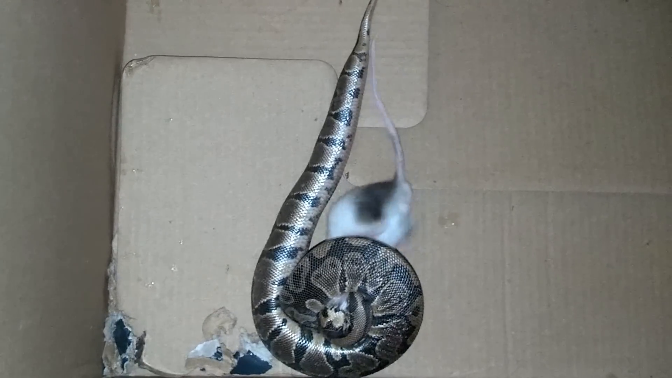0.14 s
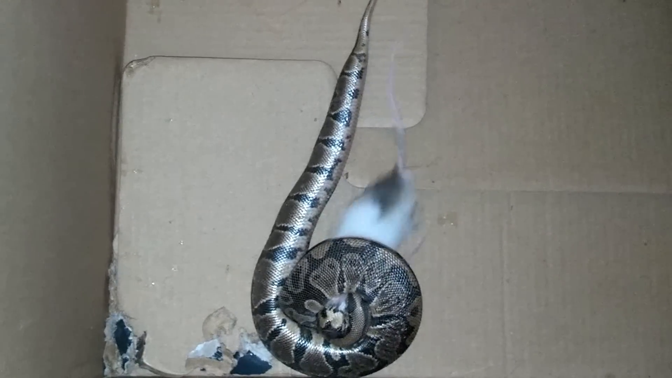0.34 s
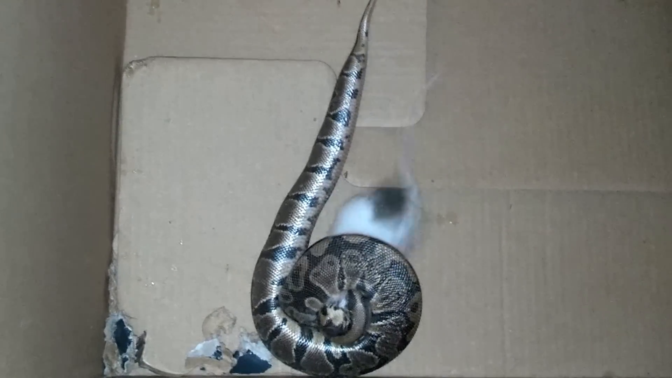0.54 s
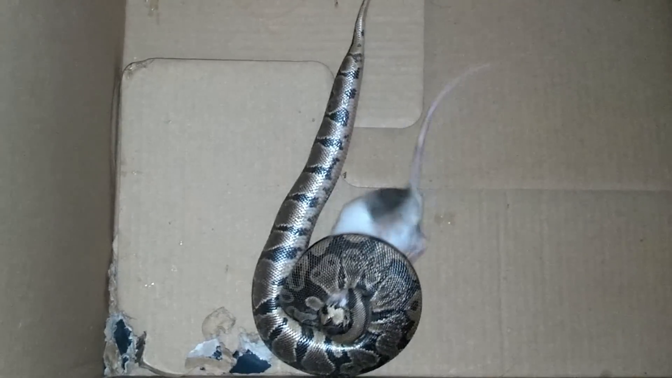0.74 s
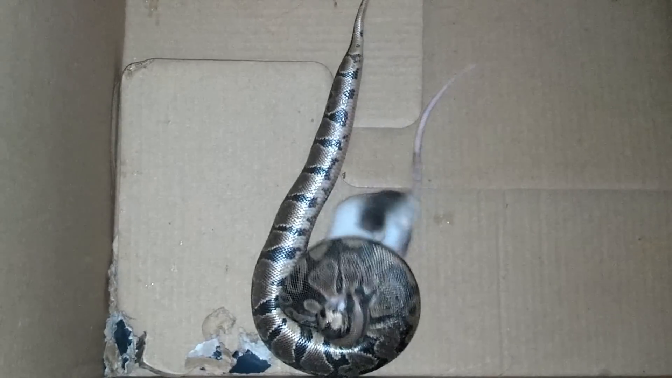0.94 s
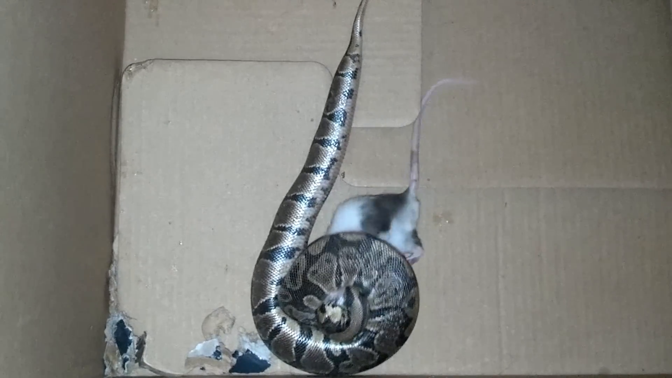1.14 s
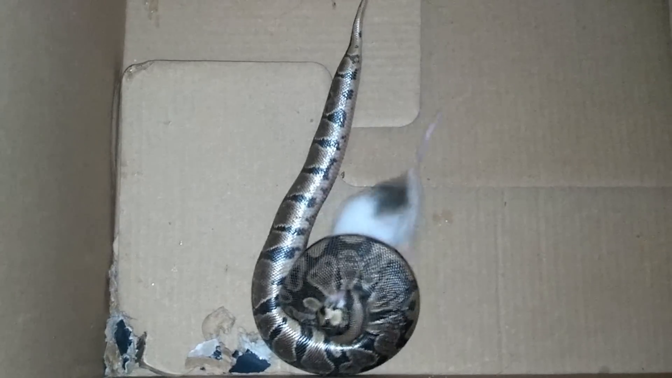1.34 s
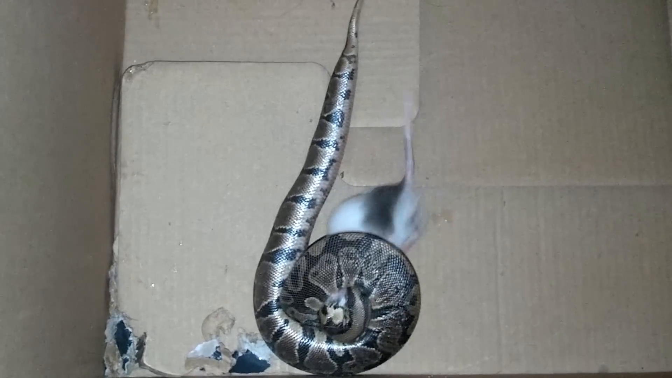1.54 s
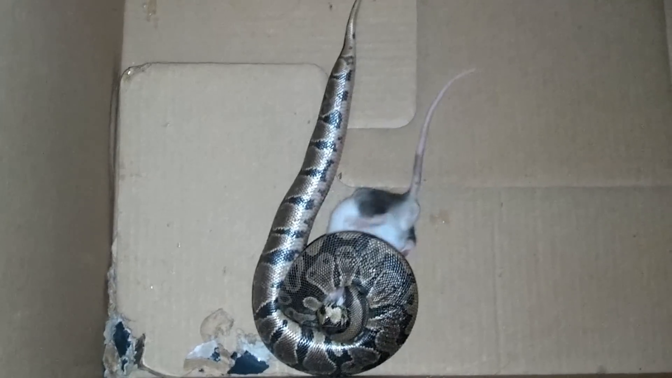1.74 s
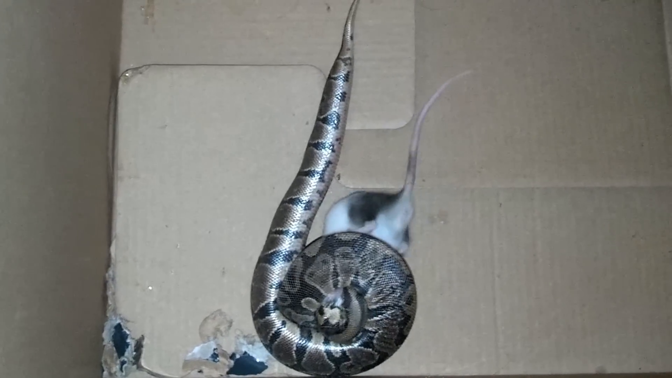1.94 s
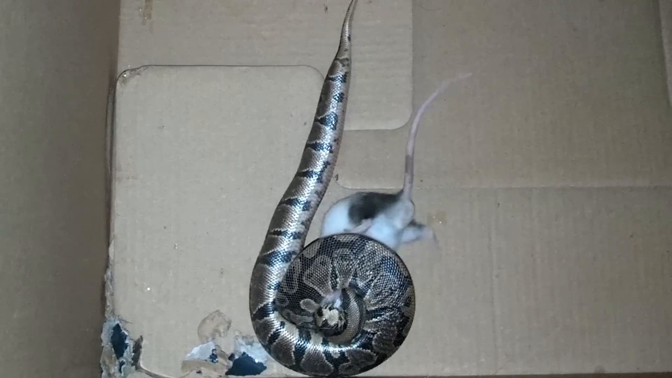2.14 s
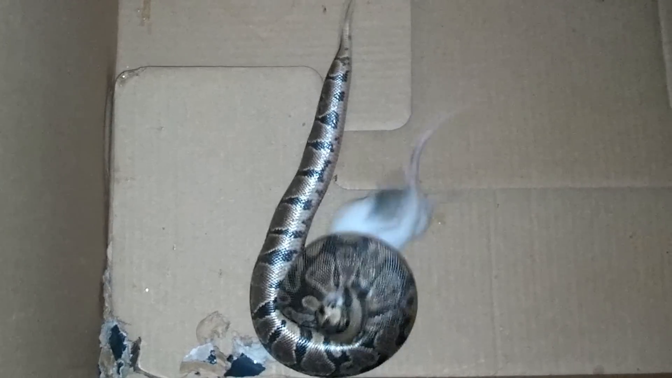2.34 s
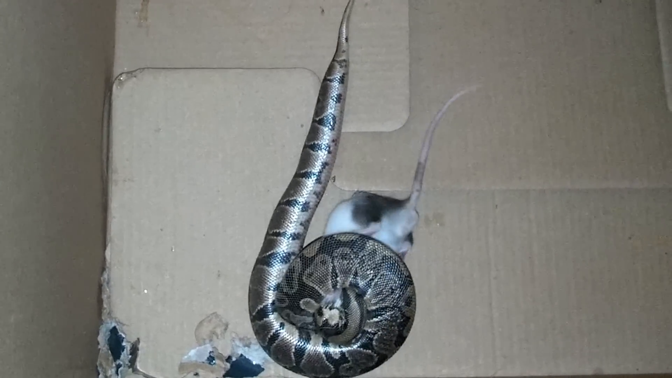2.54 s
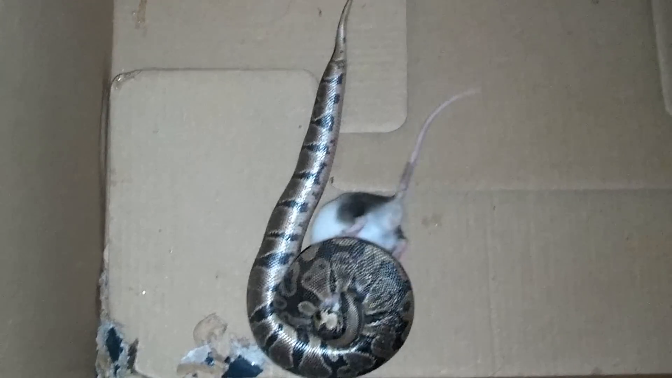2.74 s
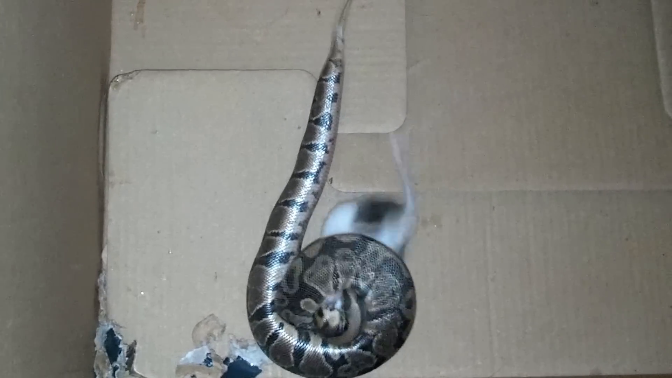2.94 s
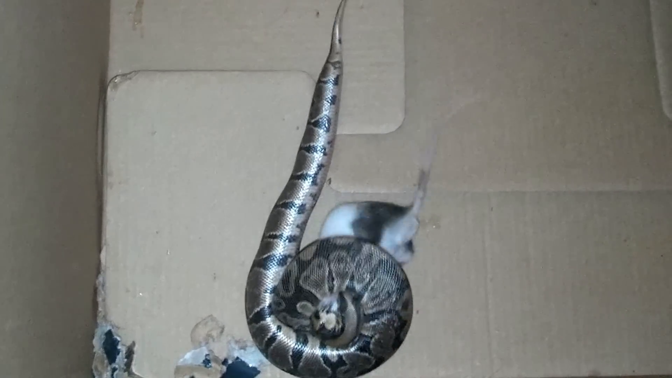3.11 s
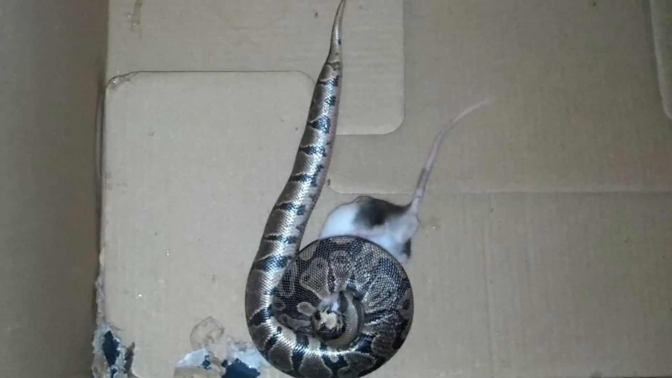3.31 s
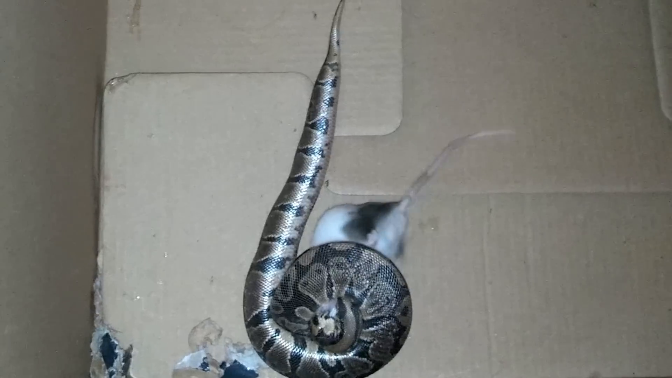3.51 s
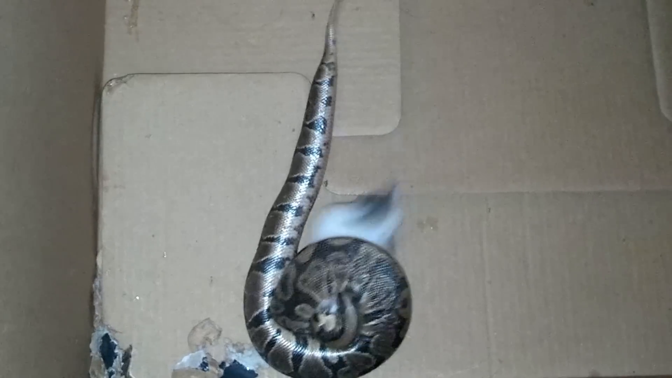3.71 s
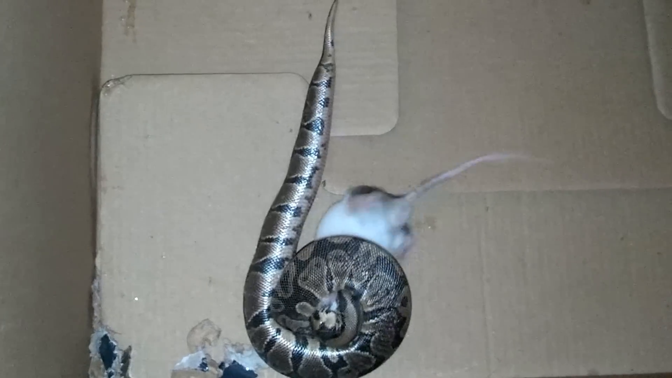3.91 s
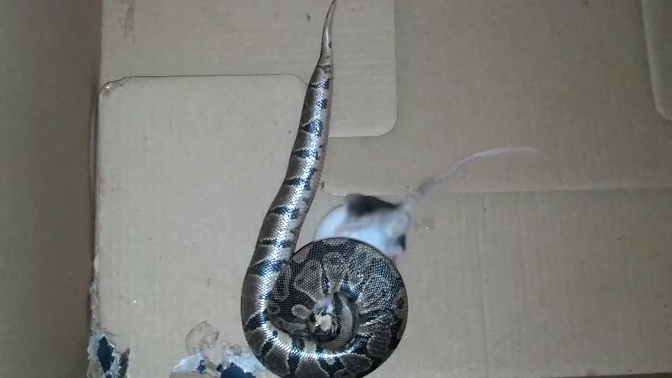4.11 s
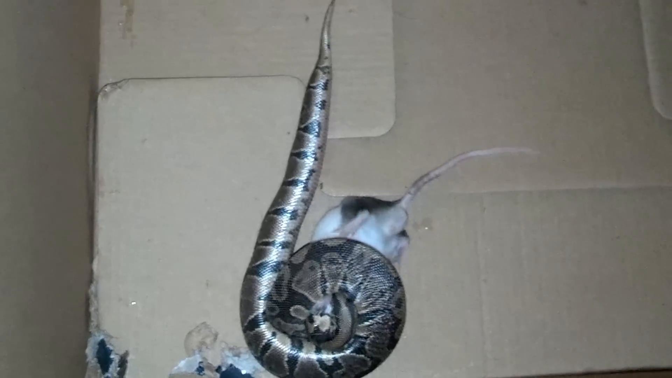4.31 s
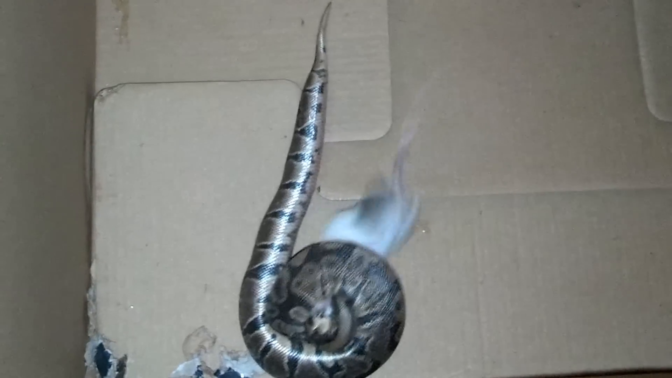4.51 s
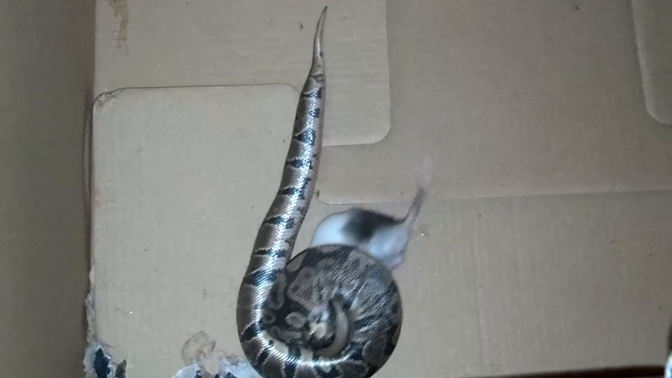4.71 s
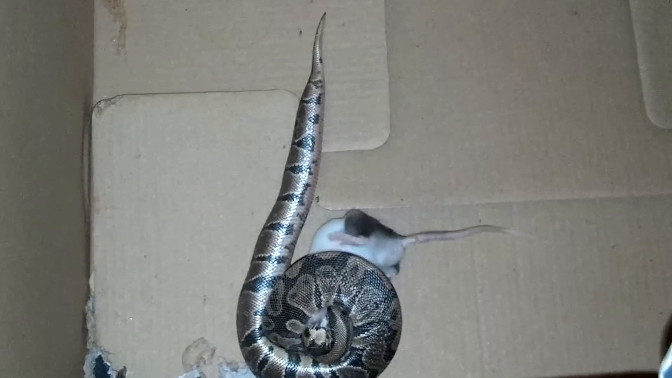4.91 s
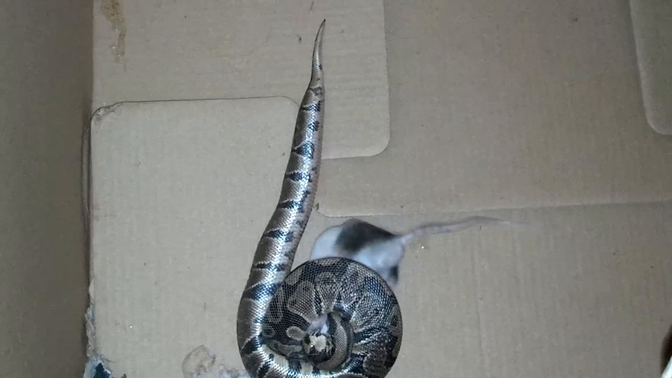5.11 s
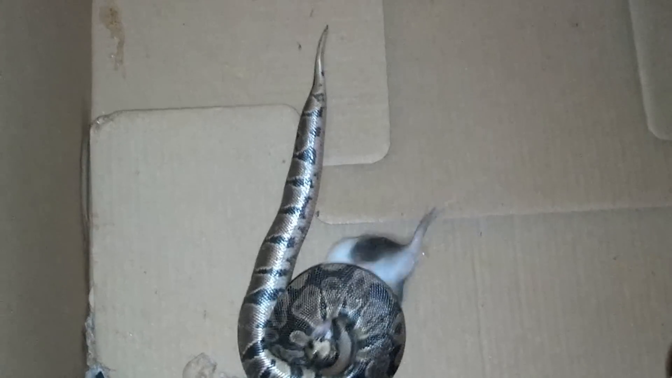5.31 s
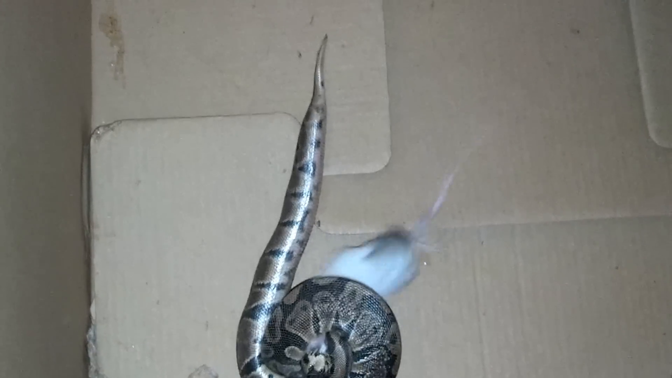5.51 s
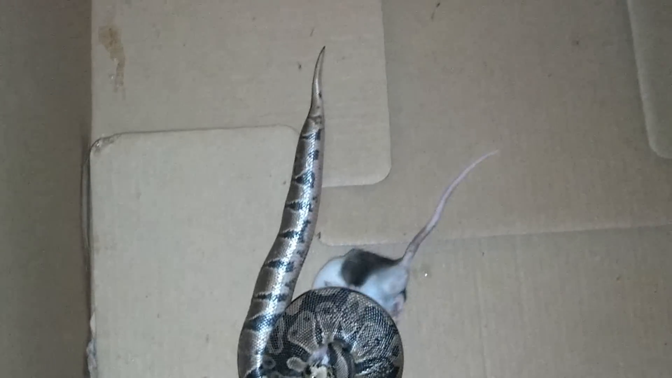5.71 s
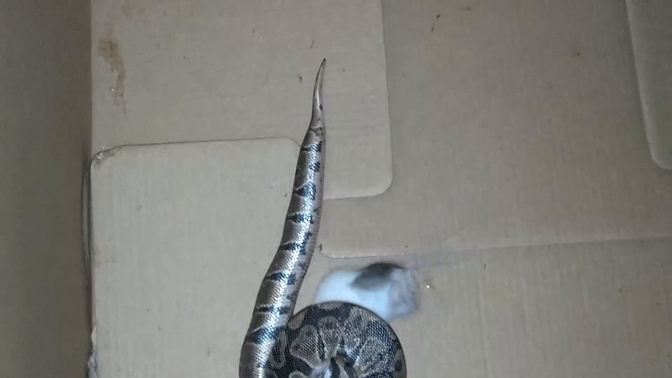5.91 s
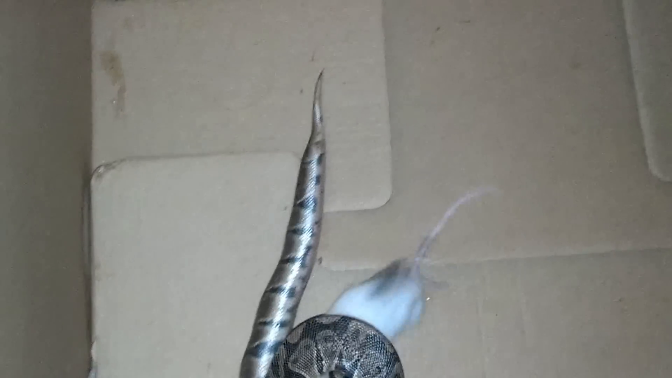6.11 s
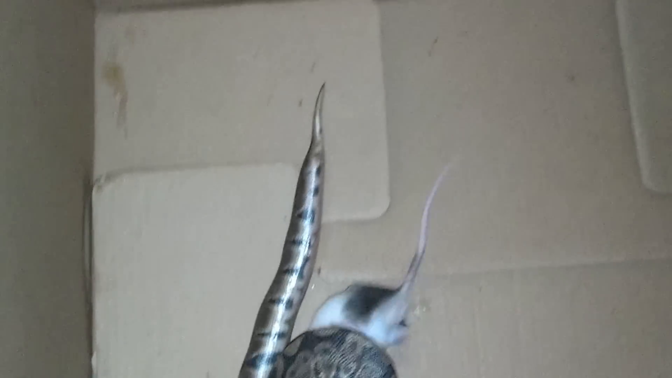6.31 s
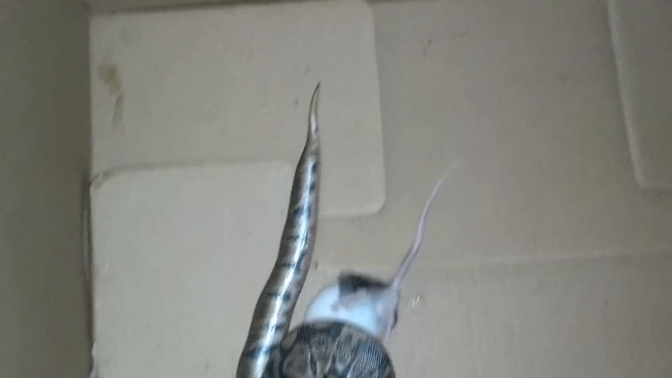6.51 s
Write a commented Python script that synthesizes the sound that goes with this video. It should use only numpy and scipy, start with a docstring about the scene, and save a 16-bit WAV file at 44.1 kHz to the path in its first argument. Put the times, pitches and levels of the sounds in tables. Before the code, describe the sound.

Irregular flurries of dry taps and light scratches on cardboard, each lasting a fraction of a second, with faint rubbing around them. Knocks are boxy and quickly damped, claw clicks crisp and papery. A low, soft room hum with slight hiss fills the gaps, thinning briefly halfway through before returning. Heard close from above in a small quiet room, wide in stereo, as a mouse kicks against a snake's coil.

```python
"""A mouse held in a snake's coil kicks in bouts on the floor of a cardboard box, heard by a small camera from above.
From the start hind feet ring the panels as damped modes, claws bite and scratch, and fur drags by friction.
Bouts follow one another to about 6.3 s; near 3.15 s the room's background dips, then returns.
Throughout, the box and a quiet room answer with diffuse, decaying noise.
The camera widens its two close microphone ports by subtracting each from the other, a little late."""
import sys
import numpy as np
from scipy import signal
from scipy.fft import rfft, irfft, next_fast_len
from scipy.io import wavfile
from scipy.ndimage import map_coordinates

SR = 44100
rng = np.random.default_rng(int(sys.argv[2]) if len(sys.argv) > 2 else 0)


def store_pcm(level_fs):
    """Save levels as 16-bit WAV."""
    pcm = np.round(np.clip(level_fs, -1, 1) * 32767).astype(np.int16)
    wavfile.write(sys.argv[1], SR, np.atleast_2d(pcm).T)


N = 288855

# Modes of the box's panels and air. Each row: frequency in Hz, nominal level in dB, nominal t60 in seconds.
BOX_MODES = [(151, -12.5, 0.21), (223, 6.5, 0.057), (257, 4.5, 0.056), (353.2, 3.5, 0.061),
             (478.6, -1, 0.033), (548, 3.5, 0.034), (613, 3, 0.044), (740, -27, 0.025), (906, -2.5, 0.031),
             (1122, -7, 0.035), (1206, -3, 0.034), (1318, -8.5, 0.05), (1464, -26, 0.039)]


def amp(db):
    """The decibel law: amplitude ratio of a level in dB."""
    return 10 ** (np.asarray(db) / 20)


def unit(x):
    """Normalisation of signal power: x at an rms of 1."""
    return x / np.sqrt(np.mean(x ** 2) + 1e-20)


def along(points, hz):
    """Interpolation of (Hz, value) points on a logarithmic frequency axis."""
    f, v = np.transpose(points)
    return np.interp(np.log(hz + 1), np.log(f + 1), v)


def curves(rows):
    """Linear interpolation in time: one value per sample for each column after the seconds."""
    s, *cols = np.transpose(rows)
    return [np.interp(np.arange(N) / SR, s, c) for c in cols]


def wobble(rate):
    """Smooth random fluctuation: a curve through random knots, rate of them a second."""
    return map_coordinates(rng.standard_normal(int(N * rate / SR) + 4), [np.arange(N) * rate / SR])


def filtered(x, response):
    """Linear filtering: the spectrum of x times a complex response of frequency."""
    m = next_fast_len(x.shape[-1] + 4096)
    return irfft(rfft(x, m) * response(np.fft.rfftfreq(m, 1 / SR)), m)[..., :x.shape[-1]]


def noise(spectrum):
    """Spectral shaping of white noise by (Hz, dB) points, to an rms of 1."""
    return unit(filtered(rng.standard_normal(N), lambda hz: amp(along(spectrum, hz))))


def kicks():
    """Modal synthesis: each soft blow rings every panel mode at a new strength; low modes build more slowly."""
    # Blows of the feet on the floor panel. Each row: start in seconds, knock level in dB,
    # thud (bass) relative to the knock in dB, tap (treble) relative to the knock in dB.
    blows = [(0.046, -53, 6, 8.5), (0.257, -26, -1, -2.5), (0.555, -63, -1, 16), (0.6, -21.5, -1.5, -2.5),
             (0.6582, -21, -4.5, -2), (0.717, -30, -5, 11), (1.046, -45, -3, -5), (1.075, -37, -17, -6),
             (1.084, -34, 0, -2), (1.307, -53, 9.5, 3.5), (1.377, -64, 0, 14), (1.421, -40.5, 15.5, 6),
             (1.457, -46.5, 12, -11), (1.476, -48, 16.5, 0), (1.545, -25.5, -3.5, -2.5),
             (1.556, -27, -3.5, 1.5), (1.599, -43.5, 9.5, -1), (1.669, -45, -3, -2.5), (1.973, -39, 5, -1),
             (2.285, -46.5, 1, 4.5), (2.314, -43, 8.5, -8), (2.328, -38.5, 0, -2), (2.391, -24, -1.5, -6.5),
             (2.411, -26, -10, 3), (2.758, -45, 5.5, -19), (2.967, -42, 6, -2), (2.98, -13, -8.5, 1.5),
             (2.997, -32.5, -3, 17), (3.075, -15, -9, -1), (3.095, -40.5, 4.5, 0), (3.675, -62, 17, -6),
             (3.691, -57, 6.5, 14.5), (3.789, -42.5, 3.5, 12), (3.808, -27, -3, -9), (3.821, -34.5, -7, 12),
             (3.829, -26, -13, 1.5), (3.951, -23, -4, -0.5), (4.432, -65.5, -12.5, 22),
             (4.473, -53.5, 3.5, 5), (4.501, -45.5, -1, 5), (4.53, -38, -6.5, 2.5), (4.561, -16.5, -4.5, 6),
             (4.684, -37.5, 0.5, 8.5), (4.696, -23, -7, -9), (5.293, -47, 2, 6), (5.339, -43.5, 8.5, -9),
             (5.422, -47.5, 16.5, -7), (5.437, -22, -2, 2), (5.449, -21.5, -7, 5), (5.485, -48, 12, -4),
             (5.573, -39.5, 7, -6), (6.037, -38, -10, 5.5), (6.084, -34, 5, 0), (6.108, -39, 5, 7),
             (6.128, -45, 4, 7), (6.173, -17.5, -9, -2.5), (6.181, -30.5, -11, 9), (6.312, -38, -1, -0.5)]
    ring_base, ring_per_db, ring_per_tap_db = 1.193, -0.0178, -0.03  # hard, sharp blows are damped sooner
    middle_db = -35  # a blow of middle strength
    out = np.zeros(N + SR)
    t = np.arange(SR // 5) / SR
    hz, level_db, t60 = np.transpose(BOX_MODES)[:, :, None]
    draws = rng.standard_normal((len(blows), 2, len(BOX_MODES), 1))
    for (start, db, thud_db, tap_db), (strength, detuning) in zip(blows, draws):
        ring = ring_base + ring_per_db * (db - middle_db) + ring_per_tap_db * tap_db
        decay_db = -60 * t / (t60 * np.clip(ring, .2, 3))
        colour_db = along([(280, thud_db), (620, 0.0042), (1150, tap_db)], hz)
        envelope = amp(level_db + colour_db + 2.6 * strength + decay_db)
        rise = 1 - np.exp(-t * hz / 0.77)
        tones = np.sin(2 * np.pi * hz * (1 + 0.02 * detuning) * t)
        blow = (envelope * rise * tones).sum(axis=0)
        out[round(start * SR):][:len(t)] += amp(db) * blow

    def radiation(f):
        """Radiation: small panels lose deep bass; the knocks are weak near 765 Hz."""
        bass_cut = (1j * f / (105 + 1j * f)) ** 4
        notch = 1 - .7j * f * 130 / (765 ** 2 - f * f + 1j * f * 130)
        return bass_cut * notch

    return filtered(out[:N], radiation)


def claws():
    """Friction noise: a claw bites, slides briefly and lets go; its angle sets the colour of the grain."""
    # Strokes on the paper face. Each row: start in seconds, level in dB, brightness in dB, slide in seconds.
    strokes = [(0.045, -48, 6.5, 0.011), (0.092, -46, -20, 0.002), (0.241, -52, 0, 0.024),
               (0.291, -47, -6, 0.001), (0.405, -51, -3.5, 0.017), (0.441, -50, 9.5, 0.0056),
               (0.556, -43, 1.5, 0.0046), (0.5985, -38, 1, 0.005), (0.6587, -34.5, 0.5, 0.0014),
               (0.711, -40.5, -10, 0.0008), (0.7153, -17, -14, 0.0012), (0.785, -41.5, 3.5, 0.00084),
               (1.035, -47.5, -3, 0.032), (1.078, -49.5, 1, 0.014), (1.133, -50, -1.5, 0.001),
               (1.3, -46, -5.5, 0.0098), (1.312, -39, -9, 0.0029), (1.343, -49, 6.5, 0.01),
               (1.385, -49, 8, 0.002), (1.421, -36.5, 0, 0.0013), (1.481, -41.5, 10.5, 0.009),
               (1.545, -28, -6, 0.0045), (1.555, -19.5, -13.5, 0.0047), (1.92, -51.5, -5, 0.0058),
               (2.028, -46.5, 2, 0.0067), (2.228, -62.5, 16, 0.0025), (2.264, -44.5, 5.5, 0.0053),
               (2.286, -46.5, -3, 0.012), (2.301, -46, -1, 0.0053), (2.323, -44, -3, 0.0096),
               (2.343, -39, -10.5, 0.013), (2.353, -34, -14, 0.00295), (2.391, -43, -1, 0.011),
               (2.411, -22.5, -7.5, 0.0024), (2.96, -37, 0, 0.0022), (2.979, -16, -25, 0.0031),
               (2.998, -15.5, -14.5, 0.001), (3.075, -33, -13, 0.016), (3.095, -24.5, 0.5, 0.00087),
               (3.566, -50.5, 6, 0.019), (3.586, -45.5, 11.5, 0.0056), (3.638, -36, -6, 0.00092),
               (3.69, -41.5, 7.5, 0.0028), (3.732, -45, -12, 0.0025), (3.789, -15.5, -10.5, 0.00078),
               (3.819, -26.5, -15, 0.008), (3.829, -16.5, -13, 0.0025), (3.953, -24.5, -41, 0.0013),
               (4.432, -41.5, 0.5, 0.0044), (4.482, -36.5, -8, 0.002), (4.544, -48, 7.5, 0.002),
               (4.563, -17, -31, 0.00092), (4.672, -48.5, -8, 0.025), (4.683, -35, -25, 0.0012),
               (4.698, -47, 1, 0.0042), (5.203, -56, 9.5, 0.0018), (5.244, -49, -0.5, 0.0025),
               (5.29, -50.5, -2, 0.028), (5.319, -45.5, 6.5, 0.01), (5.34, -45.5, 2.5, 0.015),
               (5.419, -48, 2, 0.014), (5.438, -10.5, -38.5, 0.001), (5.445, -23.5, -16, 0.0011),
               (5.459, -27.5, -3.5, 0.0011), (5.499, -50.5, -3, 0.0016), (5.573, -52, 3, 0.0087),
               (5.595, -45, 1, 0.014), (6.035, -41, 0, 0.002), (6.084, -40, -4, 0.0032),
               (6.107, -34.5, -12, 0.0012), (6.123, -35.5, -8, 0.001), (6.169, -31, -10, 0.003),
               (6.182, -16, -21, 0.0026), (6.189, -18, -3, 0.0009), (6.309, -49.5, 0.5, 0.016)]
    # Basic colour of claw on paper. Each row: frequency in Hz, level in dB.
    bite = [(900, -7), (1500, -17.5), (2230, 0.5), (2800, -1.5), (3440, 4), (4500, -2.5), (5500, -0.5),
            (6500, -7), (9500, -1.5), (12000, 1), (15500, 3)]
    # Tilt of that colour. Each row: frequency in Hz, level in dB at brightness 0, dB per dB of brightness.
    tilt = [(2380, -0.5, 0), (3950, -7, 0.29), (6660, -5.5, 0.77), (11100, -15, 1.33)]
    out = np.zeros((2, N + SR))
    t = np.arange(SR // 10) / SR
    for (start, db, bright_db, slide), fibres in zip(strokes, rng.standard_normal((len(strokes), 2, len(t)))):
        colour = [(hz, base_db + slope * bright_db) for hz, base_db, slope in tilt]
        t60 = 0.027 + 5.2 * slide  # a long slide also fades more slowly
        rise = 1 - np.exp(-t / (0.00014 + 0.02 * slide))
        stroke = amp(db - 60 * np.maximum(t - slide, 0) / t60) * rise
        # short waves scatter on the way, so the ports hear different mixtures
        ports = np.array([fibres[0] + 0.83 * fibres[1], fibres[0] - 0.62 * fibres[1]])
        grain = filtered(ports, lambda hz: amp(along(bite, hz) + along(colour, hz)))
        out[:, round(start * SR):][:, :len(t)] += stroke * grain
    uneven_catch = amp(1.8 * wobble(600) + 2.02 * wobble(150))
    return uneven_catch * out[:, :N]


def drag():
    """Friction-driven resonance: fur and feet rub in jerks, fibres snap at random, the panels hum along."""
    # Colour of dragging fur. Each row: frequency in Hz, level in dB.
    fur_colour = [(800, -14), (2000, 5), (4000, -3.5), (6000, -9.5), (10000, -12.5), (15500, -12.5)]
    feet_db, weight_db, fur_db = effort()
    jerk = wobble(35)

    def panels(f):
        """Modal superposition: damped resonances of alternating sign."""
        total = 0
        for k, (centre, db, t60) in enumerate(BOX_MODES):
            damping = 14j * f / (2 * np.pi * t60)
            total = total + (-1) ** k * amp(db) * 1j * f / t60 / (centre * centre - f * f + damping)
        return total

    weight = unit(filtered(rng.standard_normal(N), lambda f: panels(f) / (1 + (f / 450) ** 6)))
    feet = unit(filtered(rng.standard_normal(N), lambda f: panels(f) / (1 + (450 / (f + 1)) ** 6)))
    weight_hum = amp(weight_db + 3.4 * wobble(25)) * weight
    feet_hum = amp(feet_db + 4.45 * jerk + 2.1 * wobble(90)) * feet
    snaps = (rng.random(N) < 220 / SR) * amp(5.6 * rng.exponential(size=N).clip(0, 3))  # about 220 a second
    snaps = signal.lfilter([1], [1, -np.exp(-1 / (0.00066 * SR))], snaps)  # decay constant 0.66 ms
    fur = np.array([noise(fur_colour), noise(fur_colour)])
    return weight_hum + feet_hum + amp(fur_db + 2.8 * jerk) * (1 + 0.32 * snaps) * fur


def effort():
    """Addition of powers: bouts build, hold and ease over stirring at rest; levels in dB of feet, weight, fur."""
    # Bouts of struggling. Each row: full effort from in seconds, hold in seconds,
    # then the levels of feet, weight and fur in dB.
    bouts = [(0.017, 0.15, -66, -61, -63.5), (0.23, 0.2, -62, -59, -66), (0.69, 0.026, -59.5, -50, -57.5),
             (1.314, 0.1, -66, -67, -68.5), (1.453, 0.11, -57, -52.5, -58.5),
             (2.34, 0.053, -58.5, -61, -60.5), (3.0, 0.04, -64, -55, -63), (3.75, 0.1, -62.5, -52, -61),
             (4.5, 0.21, -64, -59, -65), (5.31, 0.15, -56.5, -52.5, -63), (5.58, 0.03, -62.5, -70, -64.5),
             (6.071, 0.18, -63.5, -58.5, -62.5)]
    # Stirring between bouts: the levels of feet, weight and fur in dB.
    rest_db = [-80, -76, -77]
    # Growth before a bout: feet, weight and fur in dB per second.
    build_db_per_s = [85, 82, 85]
    # Fading after a bout: feet, weight and fur in dB per second.
    ease_db_per_s = [110, 90, 118]
    t = np.arange(N) / SR
    power = amp(rest_db)[:, None] ** 2
    for start, hold, *db in bouts:
        build_db = -np.outer(build_db_per_s, np.maximum(start - t, 0))
        ease_db = -np.outer(ease_db_per_s, np.maximum(t - start - hold, 0))
        power = power + 10 ** ((np.array(db)[:, None] + build_db + ease_db) / 10)
    return 10 * np.log10(power)


def echo(x, t60_scale, piece=SR // 4):
    """Diffuse reverberation: decaying noise, different at each port and drawn anew for each piece of time."""
    # Relative decay time. Each row: frequency in Hz, t60 in seconds before t60_scale.
    decay = [(150, 0.93), (600, 0.47), (2000, 0.21), (5000, 0.21), (14000, 0.092)]
    # Likeness of the answers at the two ports. Each row: frequency in Hz, likeness from 0 to 1.
    likeness = [(200, 1), (700, 0.71), (2000, 0.1), (4000, 0.04)]
    out = np.zeros((2, N + 2 * SR))
    for start in range(0, N, piece):
        hz, t, z = signal.stft(rng.standard_normal((2, SR // 2)), SR, nperseg=256)
        share = np.clip(along(likeness, hz), 0, 1)[:, None]
        z[1] = share * z[0] + np.sqrt(1 - share ** 2) * z[1]  # long waves reach both ports alike
        t60 = t60_scale * along(decay, hz)[:, None]
        tail = signal.istft(z * amp(-60 * t / t60), SR, nperseg=256)[1]
        wet = signal.fftconvolve(x[:, start:start + piece], tail / np.linalg.norm(tail[0]), axes=1)
        out[:, start:start + wet.shape[1]] += wet
    return out[:, :N]


def room():
    """Partial coherence: steady room noise and capsule hiss, shared by the ports mostly in the low range."""
    # Background, dipping near 3.15 s. Each row: time in seconds, level in dB before the swellings.
    background = [(0, -54), (1.8, -55), (2.9, -56.5), (3.15, -64.5), (3.5, -61.5), (4.1, -55), (4.8, -56.5),
                  (5.8, -56), (6.55, -60.5)]
    # Colour of room and capsule noise. Each row: frequency in Hz, level in dB.
    air = [(20, -34), (50, -20), (120, 2.5), (400, -3), (550, -5.5), (900, -11.5), (2000, -22), (5000, -27),
           (10000, -33.5), (13000, -30.5), (15500, -24.5)]
    # Noise power shared by both ports. Each row: frequency in Hz, share from 0 to 1.
    alike = [(100, 0.16), (500, 0.54), (2000, 0.019)]
    # Swellings of the room tone. Each row: centre in Hz, width in Hz, gain in dB.
    swellings = [(118, 38, 4), (186, 23, 1), (413, 60, 2.5), (460, 83, 2), (522, 110, 5), (615, 50, -1)]
    level_db, = curves(background)
    share = lambda hz: np.clip(along(alike, hz), 0, .99)
    common = filtered(noise(air), lambda hz: np.sqrt(share(hz)))
    own = filtered(np.array([noise(air), noise(air)]), lambda hz: np.sqrt(1 - share(hz)))
    swell = lambda hz: amp(sum(db / (1 + (2 * (hz - c) / w) ** 2) for c, w, db in swellings))
    return amp(level_db + 1.2 * wobble(4.5)) * filtered(common + own, swell)


def scene():
    """Superposition of direct and diffuse sound at two ports; the mouse is a little nearer the left one."""
    # a small body radiates no deep bass
    mouse = filtered(kicks() + claws() + drag(), lambda f: (1j * f / (45 + 1j * f)) ** 2)
    lead_s, near_db = 5.5e-5, .8  # the left port leads and gains by these, the right lags and loses
    direct = filtered(mouse, lambda hz: np.exp(2j * np.pi * np.outer([1, -1], hz) * lead_s)
                      * amp([[near_db], [-near_db]]))
    box_answer = amp(-5) * echo(mouse, t60_scale=0.074, piece=SR // 20)
    room_answer = amp(-16) * echo(mouse, t60_scale=0.76)
    answer = filtered(box_answer + room_answer, lambda f: (1j * f / (50 + 1j * f)) ** 4)
    return direct + answer + room()


def record(dry):
    """Differential widening: each channel loses a late copy of the other port, then the band is limited."""
    # Strength of the subtraction. Each row: frequency in Hz, share from 0 to 1.
    crossfeed = [(50, 0.45), (250, 0.62), (900, 0.64), (2800, 1), (9000, 0.96)]
    port_lag, top_hz = 16, 15800  # delay of the subtracted copy in samples; band limit in Hz
    late = np.pad(dry[::-1], ((0, 0), (port_lag, 0)))[:, :N]
    wide = dry - filtered(late, lambda hz: np.clip(along(crossfeed, hz), 0, 1))
    return filtered(wide, lambda hz: hz < top_hz)


dry = scene()
out = record(dry)
store_pcm(out)
```